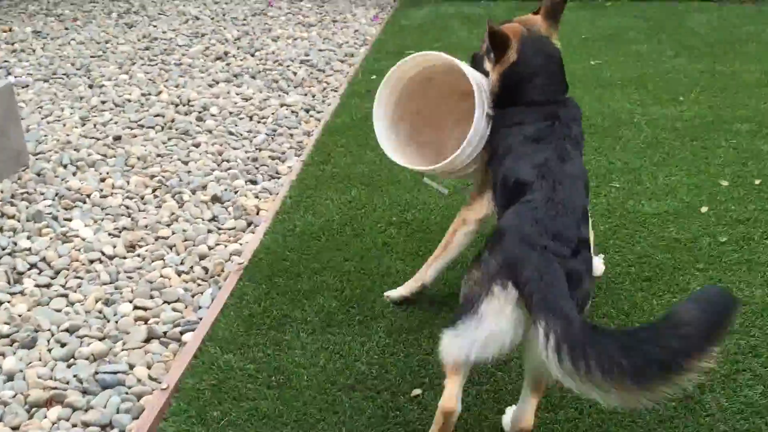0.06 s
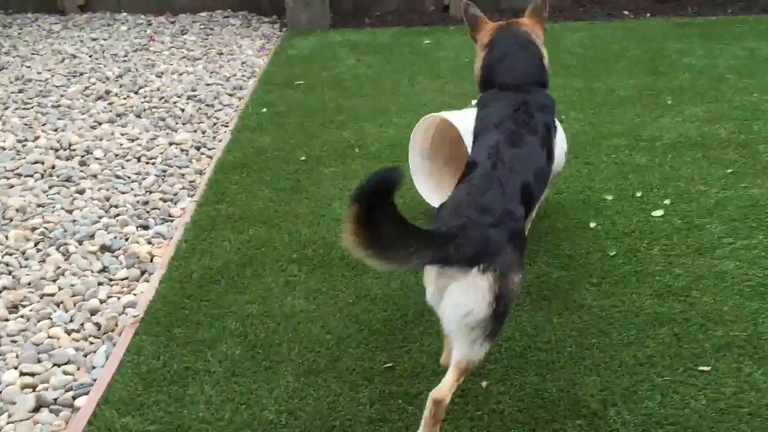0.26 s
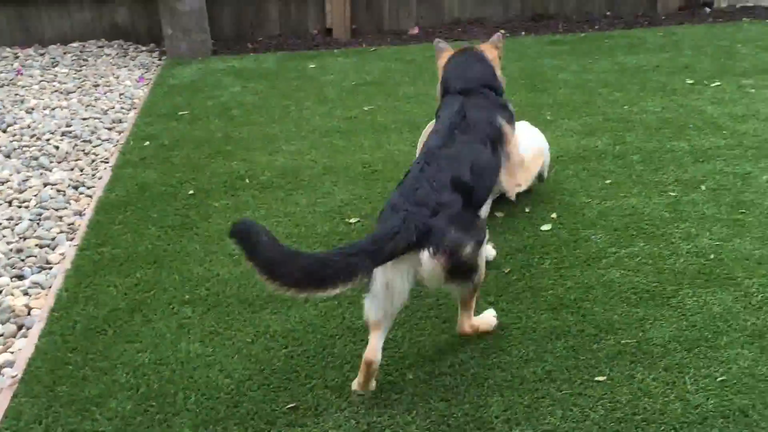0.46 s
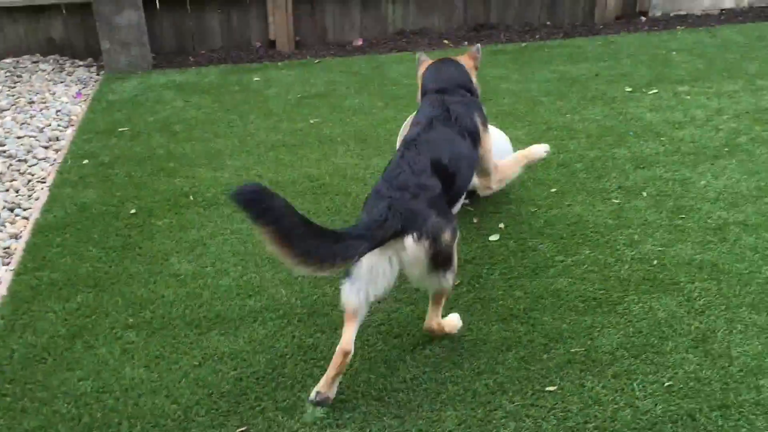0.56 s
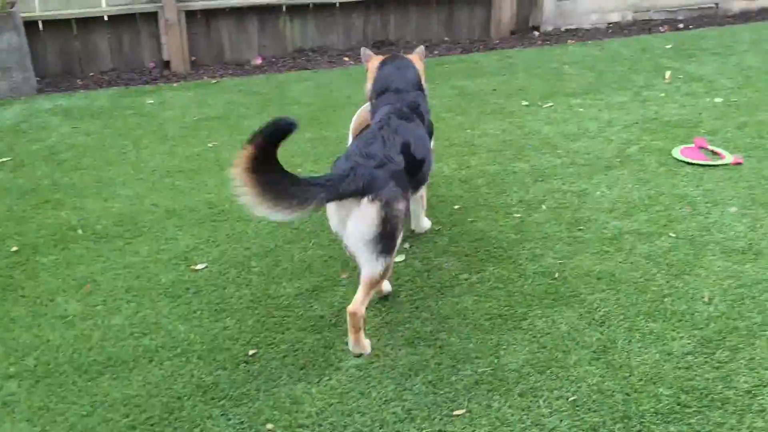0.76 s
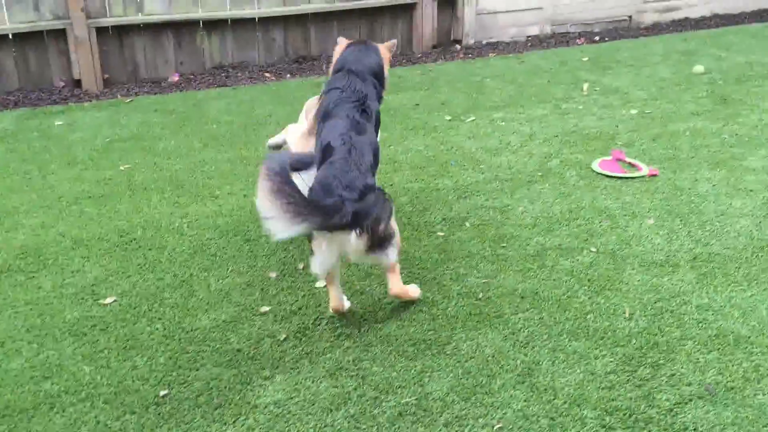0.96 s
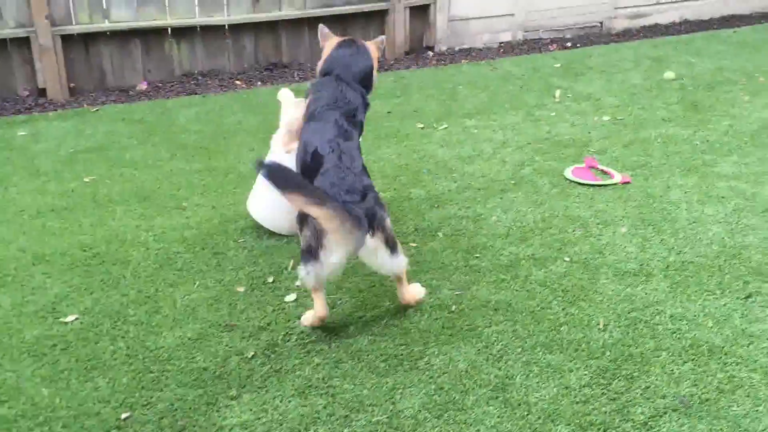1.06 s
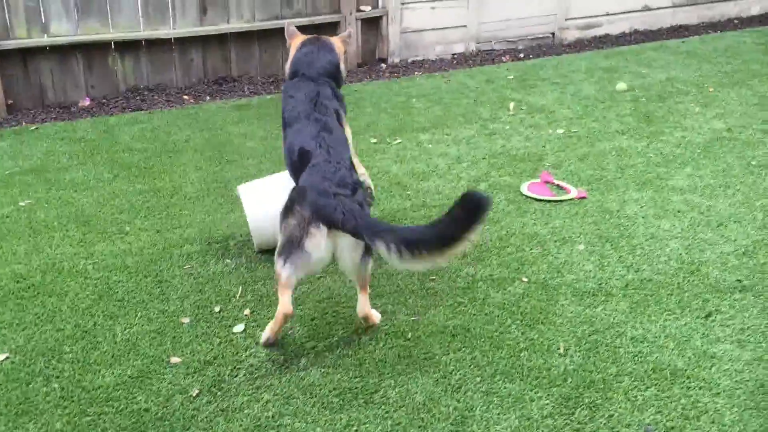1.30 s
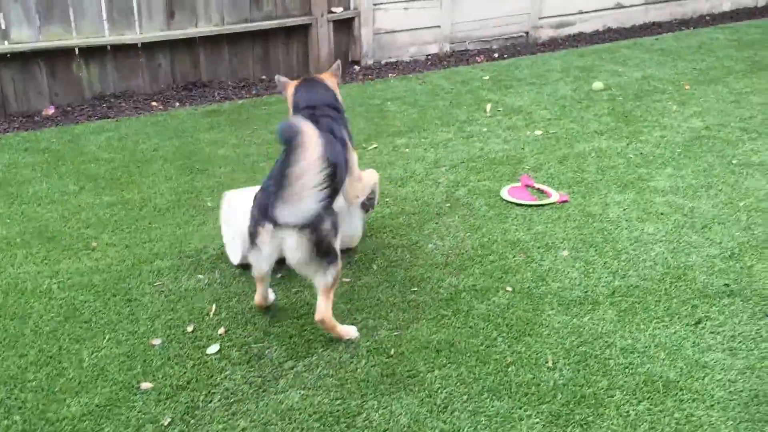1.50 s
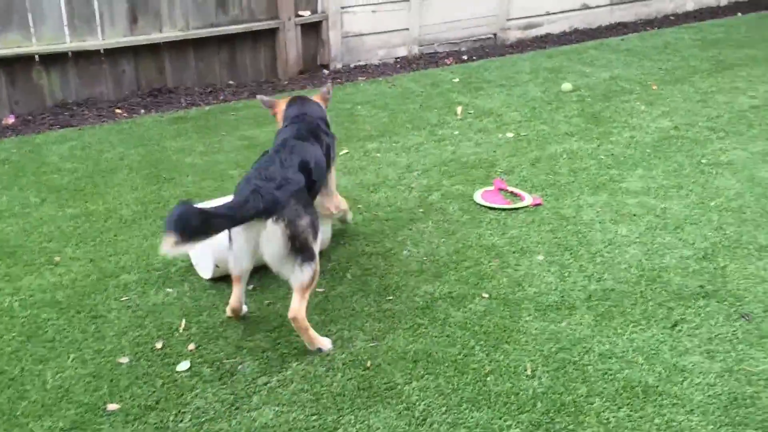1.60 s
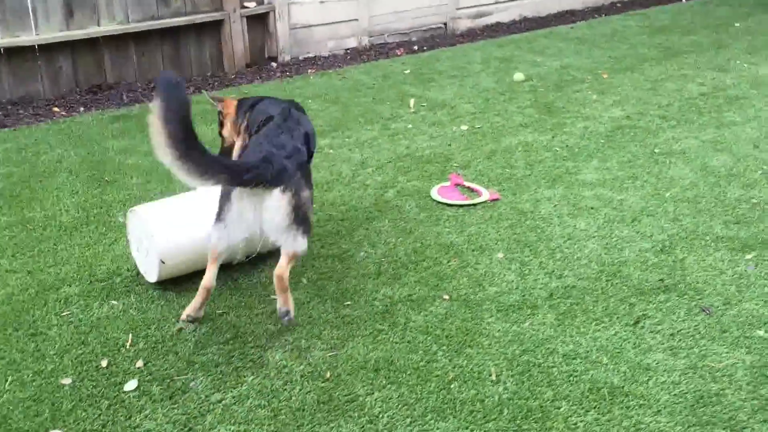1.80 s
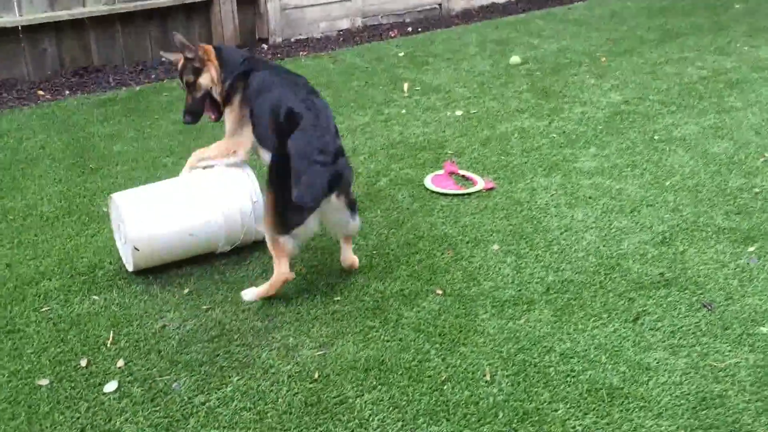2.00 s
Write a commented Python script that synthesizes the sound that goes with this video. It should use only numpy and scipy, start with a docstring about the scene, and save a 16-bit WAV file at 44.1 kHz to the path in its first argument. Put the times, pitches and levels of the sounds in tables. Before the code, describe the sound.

Hollow, irregular knocks and scrapes come from an empty plastic bucket that a dog pushes over grass nearby. It lands loudly early on, clacks under a paw and settles, with soft footfalls and a low outdoor rumble behind.

```python
"""An empty plastic bucket, shoved across a lawn by a dog. Knocks ring its panels, thin wall and rim;
stick-slip makes it scrape and squawk; hard points click on it. The air inside booms on landing,
and a paw dents the side with a clack. Paws thud on turf and brush grass; collar tags jingle faintly.
Behind: low outdoor rumble, faint hiss, a far drone and a late hum."""
import sys
import numpy as np
from scipy import signal
from scipy.io import wavfile
from scipy.ndimage import uniform_filter1d

SR = 44100
rng = np.random.default_rng(int(sys.argv[2]) if len(sys.argv) > 2 else 0)


def store_pcm(level_fs):
    """Save levels as 16-bit WAV."""
    pcm = np.round(np.clip(level_fs, -1, 1) * 32767).astype(np.int16)
    wavfile.write(sys.argv[1], SR, np.atleast_2d(pcm).T)


N = 90404
T = np.arange(SR // 2) / SR  # event time, s
BLOW_GAIN = np.sqrt(.004 * SR)  # unit energy -> energy of 4 ms at rms 1

# outdoor rumble and hiss spectra: f/Hz, level/dB
RUMBLE_SPECTRUM = [(20, -48), (35, -15), (55, -10), (100, 1), (160, -3), (210, -7), (280, -9), (380, -17),
                   (600, -29), (1500, -64), (5000, -62)]
HISS_SPECTRUM = [(100, -3), (400, 6), (650, -3), (1000, 3.5), (2000, -0.5), (3500, -15), (6000, -14.5),
                 (8000, -20.5), (16000, -28.5)]
# their envelopes: t/s, level/dB
RUMBLE_ENVELOPE = [(0, -44), (.35, -44.5), (.7, -42), (1.0, -38.5), (1.3, -38.5), (1.6, -41), (1.85, -38),
                   (2.05, -40.5)]
HISS_ENVELOPE = [(0, -49), (.38, -56.5), (.9, -53), (1.6, -48.5), (1.87, -60), (2.05, -51)]
# wall spectrum: f/Hz, level/dB
WALL_SPECTRUM = [(60, -23), (250, -8), (500, -14), (730, -7.5), (960, -1), (1130, -3.5), (1550, -0.5),
                 (2200, -2), (2650, -11), (3250, -10.5), (3650, -12), (4200, -13.5), (5000, -20),
                 (6100, -16), (7800, -27.5), (9850, -25), (10400, -34), (12500, -34), (16000, -41)]
# decay of the dense wall ring: f/Hz, t60/s
WALL_DECAY = [(200, 0.15), (1000, 0.19), (2000, 0.28), (5000, 0.23), (15000, 0.15)]
# modes of wall, open rim, inner air and base, flexing side, tags: f/Hz, level/dB, t60/s
MAIN_WALL_MODES = [(765, 3, 0.25), (1076, 5, 0.2), (1258, 10.5, 0.085), (1482, 4.5, .18), (1424, 1.5, .18),
                   (1626, 5.5, 0.24), (1678, 5, 0.26), (1810, 1.5, 0.28), (1970, 7, 0.13), (2096, -2, 0.15),
                   (2128, -4.5, 0.57), (2256, 6, .18), (2958, -1, 0.29)]
OPEN_RIM_MODES = [(952, 0, 0.32), (977, -2.5, 0.24)]
CAVITY_MODES = [(113.7, 2, 0.55), (179, 4, 0.073), (218, -8, .27), (298, -11.5, 0.15)]
FLEX_MODES = [(282, -3.5, 0.1), (354, -3.5, 0.11), (450, -3.5, 0.1), (521, -5.5, 0.062), (990, 1, 0.061),
              (1297, 6, 0.019), (1560, -3, 0.054), (1673, 6, 0.036)]
METAL_MODES = [(5450, -1, .03), (5600, 1, 0.033), (6250, -1, .03)]
# wall slides and rolls: t/s, length/s, level/dB, tilt/(dB/oct), body/dB
WALL_SCRAPES = [(0, 0.036, -43.5, -12, 1), (0.138, 0.044, -48.5, 4, 4), (.43, 0.093, -37, 4, 14),
                (0.509, 0.085, -36.5, 3.5, 7), (0.578, 0.16, -44, 3.5, -8), (0.734, 0.069, -39.5, 3, 11),
                (0.799, 0.15, -52.5, -1, -4), (0.981, 0.1, -39, -3, 2), (1.109, 0.16, -43.5, 2, 9.5),
                (1.252, 0.084, -43.5, 4, 5), (1.391, .05, -35.5, 0, -11), (1.445, 0.067, -34, 0.5, 8.5),
                (1.5, 0.062, -41.5, 0.5, -1), (1.546, 0.14, -50, 0.5, 0), (1.704, 0.13, -52, 1, 9.5)]
# blows: t/s, level/dB, tilt/(dB/oct), body/dB, wall ring/dB, rim/dB, panel f/Hz, attack/s
BUCKET_KNOCKS = [(.013, -37, -0.5, -22, -7, -8, 1660, 0.0023), (.025, -32.5, -3, 5, 1, -7, 1620, .0012),
                 (.074, -35, -0.5, 4.5, -1, -9, 1298, 0.0014), (.133, -30.5, -.5, -1, 4, -4.5, 1605, .003),
                 (.22, -34, 5, -4, -9, -14, 1440, 0.0019), (.227, -27.5, 2, 14.5, -1.5, -5.5, 665, 0.0017),
                 (.235, -26, 2, 5.5, 1, -11, 1482, 0.0021), (.424, -35.5, -.5, 1, -5, -12, 2290, 0.0022),
                 (.433, -32, -4, -11, 8.5, -18, 1160, 0.002), (.454, -30, -3.5, 5, 9, -12, 1620, 0.00074),
                 (.468, -23.5, -2.5, -6, -3, -7, 1680, 0.00052),
                 (.4775, -17, -1.5, -13, -1.5, -13.5, 2033, .0004),
                 (.482, -22.5, -1, -9, 7, -7, 1460, 0.001), (.486, -27, -5, 13.5, 0, -18, 1496, 0.0024),
                 (.499, -23.5, 2.5, 1, 0.5, -8, 2060, 0.0023), (.503, -17.5, -2, -1, -2, -14, 2167, .0008),
                 (.527, -25.5, 1.5, -5, 2, -3.5, 2100, .0007), (.609, -31, -0.5, 4, 3, -11, 1610, 0.00095),
                 (.617, -33, 3, 10, 4.5, -12, 1470, 0.003),
                 (.725, -25.5, -5.5, -20, -5, -8.5, 1468, 0.0076),
                 (.741, -30, 2, -2, 4.5, -4, 1790, 0.00077), (.767, -32, -0.5, -23, -15, -7, 2024, 0.00079),
                 (.996, -26.5, -4, -15, 0, -15, 1358, 0.0021), (1.013, -31, 2.5, 4, 3.5, -8, 1312, 0.0012),
                 (1.032, -36, 4, 15, -5, -7, 1680, 0.0011), (1.121, -40, -2, 6, 8.5, -8, 1857, .0034),
                 (1.164, -33, 1, -20, 5.5, -18, 1900, 0.0012), (1.167, -29, 0, 8, 1.5, -10, 2170, 0.0035),
                 (1.181, -31.5, .5, 10, -23, -10, 1457, 0.0019),
                 (1.351, -29.5, 0, -12, -1.5, -7, 1886, 0.0005),
                 (1.366, -36, 2.5, -27, 4.5, -20, 2080, 0.00024),
                 (1.394, -27.5, -1, -3, 4, -8, 2283, 0.00084), (1.409, -45, 6, 9, -11, -12, 1600, 0.0007),
                 (1.443, -28, 1.5, 8, -1, -18, 1830, 0.00076), (1.45, -29, -2, 2.5, 4, -4.5, 1340, 0.0014),
                 (1.475, -28.5, 1.5, 13, -8, -23, 2290, 0.00075),
                 (1.696, -41, 0.5, 14, -19, -8, 813, 0.0011),
                 (1.782, -35.5, -13, -2, -4.5, -24, 1403, 0.00049),
                 (1.882, -43, -8.5, 10, -13, -11, 1007, 0.0033),
                 (1.93, -46.5, -7.5, -11, 6, -12, 1050, 0.00081)]
# dry wall squawks: t/s, length/s, level/dB, f/Hz
WALL_RUBS = [(0.013, 0.025, -37, 1600), (.229, 0.023, -35, 1700), (0.24, .022, -39, 3130),
             (0.61, .02, -32.5, 1410)]
# ticks, as of claws or teeth on the rim: t/s, level/dB, centre f/Hz, skirt/dB
RIM_CLICKS = [(0.026, -42.5, 5400, -27), (0.097, -49, 6840, -26), (.134, -41, 6540, -36),
              (.63, -42.5, 9700, -16), (0.742, -50, 11000, -12), (0.785, -44.5, 6500, -20),
              (.998, -45, 10700, -15), (1.004, -48.5, 11100, -14), (1.03, -53, 11000, -17),
              (1.138, -39, 3900, -24), (1.252, -41.5, 6000, -10), (1.259, -39, 7600, -11),
              (1.2672, -38, 4440, -21), (1.275, -35, 4570, -12), (1.286, -46, 6000, -15),
              (1.366, -49, 5000, -10), (1.3939, -39, 5000, -17), (2.017, -54, 3600, -26)]
# paws and bucket press the turf: t/s, level/dB, f/Hz
TURF_THUDS = [(0.101, -31, 106), (.167, -36, 95), (0.233, -29, 85), (0.888, -29.5, 103), (1.119, -36, 105),
              (1.403, -31, 140), (1.441, -27, 95), (1.476, -27, 117), (1.749, -31.5, 139)]
# far drone and late low hum: t/s, f/Hz, level/dB
DRONE_CURVE = [(.3, 205, -67), (.55, 230, -45), (.66, 258, -44), (.85, 263.7, -69), (1.0, 294.5, -47),
               (1.2, 287, -62.5)]
HUM_CURVE = [(1.55, 139.2, -66), (1.66, 142.9, -44), (1.78, 152.4, -45), (1.86, 158.7, -38.5),
             (1.95, 159.2, -48), (2.05, 146.6, -45)]
# paws brush grass: t/s, length/s, level/dB
GRASS_SWISHES = [(0.336, 0.057, -64), (0.887, 0.072, -61), (1.247, .045, -47), (1.716, 0.065, -65),
                 (1.859, 0.083, -65), (2.042, .039, -50)]
# brushed grass spectrum: f/Hz, level/dB
GRASS_SPECTRUM = [(1000, -7), (4000, 1), (9000, 0.5), (13000, 2), (16000, -1.5)]
# bucket landings, paw stamp on its side, tag jingles: t/s, level/dB
BUCKET_LANDINGS = [(.468, -20.5), (1.472, -32)]
PAW_DENTS = [(1.3849, -23.5)]
TAG_JINGLES = [(1.781, -57), (1.812, -53), (1.953, -50.5)]


def amp(db):
    """dB to gain."""
    return 10 ** (np.asarray(db) / 20)


def unit_energy(x):
    """Scale to energy 1."""
    return x / np.sqrt(np.sum(x ** 2) + 1e-20)


def unit_rms(x):
    """Scale to rms 1."""
    return unit_energy(x) * np.sqrt(len(x))


def lookup(table, hz):
    """Interpolate over log frequency."""
    f, value = np.transpose(table)
    return np.interp(np.log(hz + 1), np.log(f + 1), value)


def bell(hz, centre_hz, width_oct):
    """Gaussian over log frequency, peak 1."""
    return np.exp(-.5 * (np.log2((hz + 1) / centre_hz) / width_oct) ** 2)


def add(mix, start_s, sound):
    """Mix in at start_s."""
    part = mix[max(round(start_s * SR), 0):][:len(sound)]
    part += sound[:len(part)]


def colour(x, db_at, size=4096):
    """Minimum-phase filter, gain db_at(hz)."""
    hz = abs(np.fft.fftfreq(size, 1 / SR))
    log_gain = np.log(amp(np.maximum(db_at(hz), -100)))
    taps = np.fft.ifft(np.exp(np.conj(signal.hilbert(log_gain)))).real[:size // 2]
    return signal.fftconvolve(x, taps)[:len(x)]


def ringing(modes):
    """Damped sines; strengths vary with the contact point."""
    return sum(amp(db - 60 * T / t60_s) * rng.uniform(0.67, 1)
               * np.sin(2 * np.pi * (hz * T + rng.random())) for hz, db, t60_s in modes)


def outdoor_noise(spectrum, envelope):
    """Rumble or hiss: coloured noise, slowly varying level."""
    level_db = np.interp(np.arange(N) / SR, *np.transpose(envelope))
    noise = colour(rng.standard_normal(N), lambda hz: lookup(spectrum, hz))
    return amp(level_db) * unit_rms(noise)


def dense_ring():
    """Countless weak wall modes, each band with its own decay."""
    hz, t, bands = signal.stft(rng.standard_normal(len(T)), SR, nperseg=256)
    decay = amp(-60 * t / lookup(WALL_DECAY, hz)[:, None])
    _, ring = signal.istft(bands * decay, SR, nperseg=256)
    return unit_energy(ring[:len(T)])


def wall(tilt_db_oct, body_db, ring_db, attack_s=0.0017, snap_s=0.0043):
    """Wall response to one contact: snap, dense ring, main modes. Soft contacts build slowly."""
    def gain_db(hz):
        treble_db = tilt_db_oct * np.log2(np.maximum(hz, 1000) / 1600)
        return lookup(WALL_SPECTRUM, hz) + treble_db + body_db * bell(hz, centre_hz=530, width_oct=0.61)
    rise = np.minimum(T / attack_s, 1)
    contact = rng.standard_normal(len(T)) * rise * np.exp(-np.maximum(T - attack_s, 0) / snap_s)
    snap = unit_energy(colour(contact, gain_db))
    ring = amp(-2) * unit_energy(colour(dense_ring(), gain_db))
    modes = amp(-6) * unit_energy(ringing(MAIN_WALL_MODES))
    return snap + rise * amp(ring_db) * (ring + modes)


def scrape(length_s, tilt_db_oct, body_db, slips_per_s=900, rise_s=0.0083, fade_db=-7):
    """Uneven slips drive the wall."""
    t = np.arange(0, length_s, 1 / SR)
    chance, size, sign = rng.random((3, len(T)))[:, :len(t)]
    slip_db = -2.5 * np.log(size + 0.018)  # many small, few large
    slips = (chance < slips_per_s / SR) * amp(slip_db) * np.sign(sign - .5)
    drive = unit_rms(slips * np.minimum(t / rise_s, 1) * amp(fade_db * t / length_s))
    return signal.fftconvolve(drive, unit_energy(wall(tilt_db_oct, body_db, ring_db=0)))


def knock(tilt_db_oct, body_db, ring_db, rim_db, panel_hz, attack_s, panel_t60_s=0.078):
    """Short note of the struck panel over wall clatter; the rim rings on."""
    rise = np.minimum(T / attack_s, 1)
    panel = unit_energy(rise * ringing([(panel_hz, 0, panel_t60_s)]))
    rim = unit_energy(rise * ringing(OPEN_RIM_MODES))
    clatter = wall(tilt_db_oct, body_db, ring_db, attack_s)
    return BLOW_GAIN * (amp(-0.5) * clatter + amp(-3.5) * panel + amp(rim_db) * rim)


def held(x, cutoff_hz=9500):
    """The dog's hold damps the top treble."""
    return signal.sosfilt(signal.butter(2, cutoff_hz, fs=SR, output="sos"), x)


def rub(length_s, hz, width_hz=135, edge_s=0.0028):
    """Uneven stick-slip keeps one panel ringing, phase adrift."""
    t = np.arange(0, length_s, 1 / SR)
    pole = np.exp(-np.pi * width_hz / SR)
    noise = rng.standard_normal(len(T)) + 1j * rng.standard_normal(len(T))
    drift = signal.lfilter([1 - pole], [1, -pole], noise)[-len(t):]
    tone = (drift / np.sqrt(abs(drift) + 1e-12) * np.exp(2j * np.pi * hz * t)).real
    gate = np.clip(np.minimum(t, length_s - t) / edge_s, 0, 1)
    return unit_rms(tone * gate)


def click(centre_hz, skirt_db, decay_s=0.0019, grit_share=0.96, ring_db=-14):
    """A hard point taps the plastic: impulse, grit, faint ring."""
    crack = grit_share * unit_energy(rng.standard_normal(len(T)) * np.exp(-T / decay_s))
    crack[0] += 1 - grit_share
    tap = unit_energy(crack) + amp(ring_db) * dense_ring()
    tick = colour(tap, lambda hz: skirt_db * (1 - bell(hz, centre_hz, width_oct=0.28)))
    return BLOW_GAIN * unit_energy(tick)


def thud(hz, peak_s=0.0047):
    """Pressed turf: a soft, low pulse."""
    return T / peak_s * np.exp(1 - T / peak_s) * np.sin(2 * np.pi * hz * T)


def drone(curve, waver_rms=0.59, fade_s=0.096):
    """Distant gliding tone; the level wavers."""
    t = np.arange(N) / SR
    times_s, hz, db = np.transpose(curve)
    gate = np.clip(np.minimum(t - times_s[0], times_s[-1] - t) / fade_s + 1, 0, 1)
    slow_noise = uniform_filter1d(uniform_filter1d(rng.standard_normal(N), size=900), size=900)
    flutter = 1 + waver_rms * unit_rms(slow_noise)
    phase = 2 * np.pi * np.cumsum(np.interp(t, times_s, hz)) / SR
    return np.sqrt(2) * gate * flutter * amp(np.interp(t, times_s, db)) * np.sin(phase)


def swish(length_s, flicks_per_s=700, flick_share=0.48):
    """Grass blades slide past a paw; some flick back."""
    flicks = unit_rms((rng.random(len(T)) < flicks_per_s / SR) * rng.standard_normal(len(T)))
    drive = flick_share * flicks + (1 - flick_share) * rng.standard_normal(len(T))
    swell = np.sin(np.pi * np.minimum(T / length_s, 1))
    return swell * unit_rms(colour(drive, lambda hz: lookup(GRASS_SPECTRUM, hz)))


def boom(rise_s=0.0024):
    """A landing drives the air and base modes in phase."""
    modes = sum(amp(db - 60 * T / t60_s) * np.sin(2 * np.pi * hz * T) for hz, db, t60_s in CAVITY_MODES)
    return -(1 - np.exp(-T / rise_s)) * modes


def dent(rise_s=.0005):
    """The side flexes under a paw: a hard clack."""
    return np.minimum(T / rise_s, 1) * ringing(FLEX_MODES)


def jingle(touches_per_s=370, settle_s=0.0086, detune=0.033):
    """Metal collar tags chatter against each other."""
    touching = rng.random(len(T)) < touches_per_s / SR
    touches = touching * rng.standard_normal(len(T)) * np.exp(-T / settle_s)
    touches[0] = 0.59  # first strike
    modes = [(hz * (1 + detune * rng.standard_normal()), db, t60_s) for hz, db, t60_s in METAL_MODES]
    return BLOW_GAIN * unit_energy(signal.fftconvolve(touches, ringing(modes)))


def scene(held_until_s=.4):
    """Background, turf, collar and bucket; mono."""
    mix = outdoor_noise(RUMBLE_SPECTRUM, RUMBLE_ENVELOPE) + outdoor_noise(HISS_SPECTRUM, HISS_ENVELOPE)
    mix += drone(DRONE_CURVE) + drone(HUM_CURVE)
    for start_s, db, hz in TURF_THUDS:
        add(mix, start_s, amp(db) * thud(hz))
    for start_s, length_s, db in GRASS_SWISHES:
        add(mix, start_s, amp(db) * swish(length_s))
    for start_s, db in TAG_JINGLES:
        add(mix, start_s, amp(db) * jingle())
    for start_s, db, *timbre in BUCKET_KNOCKS:
        blow = amp(db) * knock(*timbre)
        add(mix, start_s, held(blow) if start_s < held_until_s else blow)
    for start_s, db in PAW_DENTS:
        add(mix, start_s, amp(db) * dent())
    for start_s, length_s, db, tilt_db_oct, body_db in WALL_SCRAPES:
        add(mix, start_s, amp(db) * scrape(length_s, tilt_db_oct, body_db))
    for start_s, length_s, db, hz in WALL_RUBS:
        add(mix, start_s, amp(db) * rub(length_s, hz))
    for start_s, db, centre_hz, skirt_db in RIM_CLICKS:
        add(mix, start_s, amp(db) * click(centre_hz, skirt_db))
    for start_s, db in BUCKET_LANDINGS:
        add(mix, start_s, amp(db) * boom())
    return mix[None]


def record(dry, low_cut_hz=38, band_limit_hz=15780):
    """Microphone low cut, then band limit."""
    highpass = signal.butter(3, low_cut_hz, "highpass", fs=SR, output="sos")
    lowpass = signal.firwin(511, band_limit_hz, window=("kaiser", 9), fs=SR)
    return signal.oaconvolve(signal.sosfilt(highpass, dry), lowpass[None], "same")


dry = scene()
out = record(dry)
store_pcm(out)
```